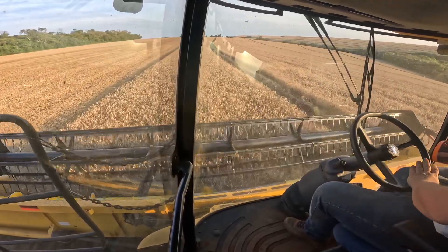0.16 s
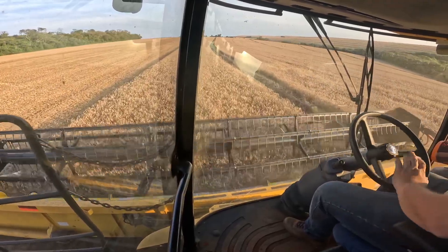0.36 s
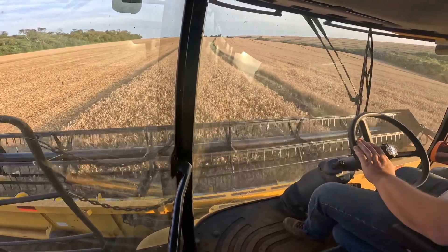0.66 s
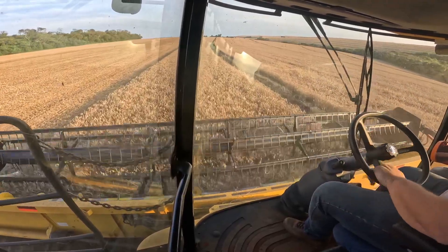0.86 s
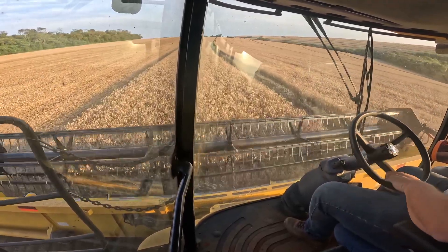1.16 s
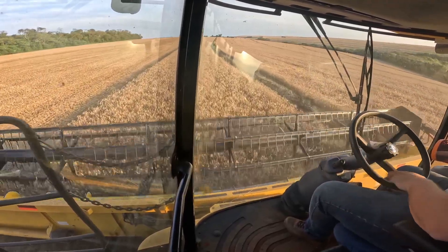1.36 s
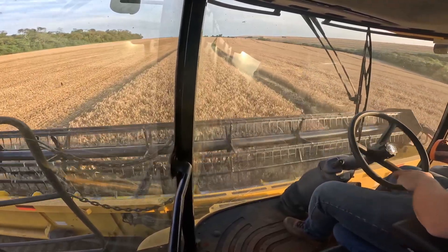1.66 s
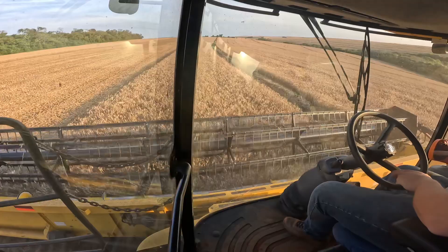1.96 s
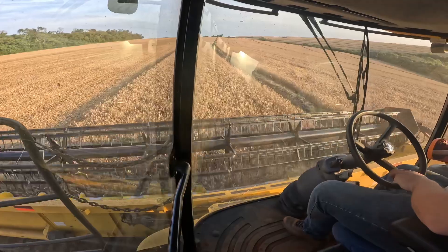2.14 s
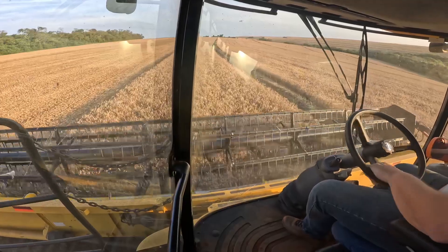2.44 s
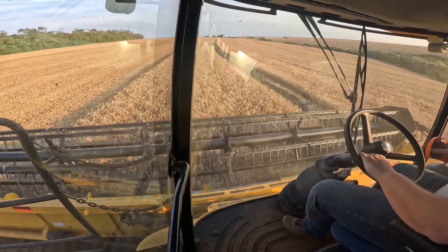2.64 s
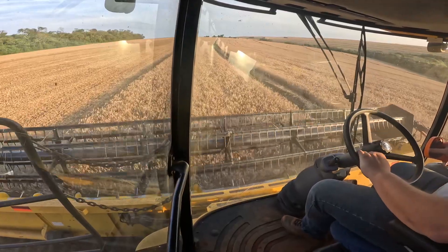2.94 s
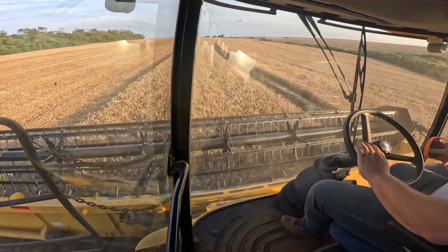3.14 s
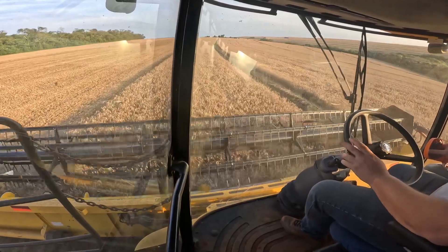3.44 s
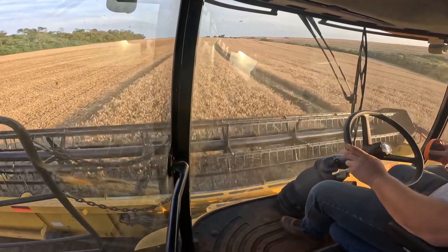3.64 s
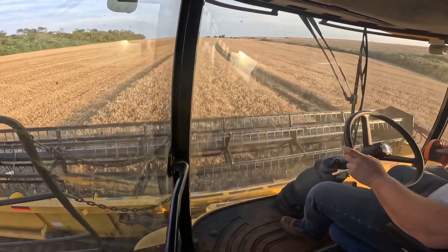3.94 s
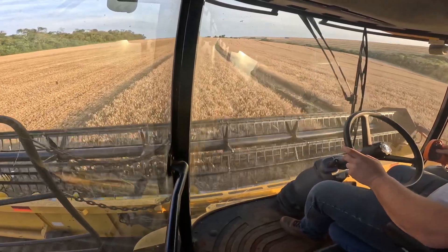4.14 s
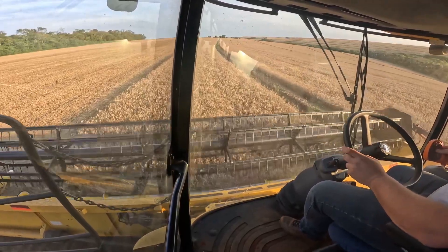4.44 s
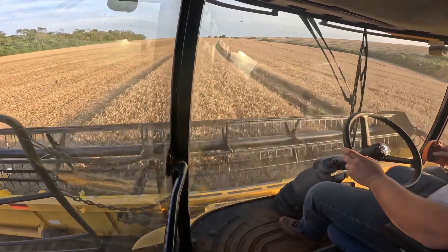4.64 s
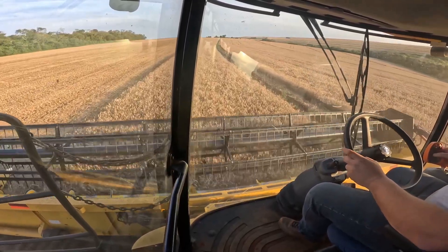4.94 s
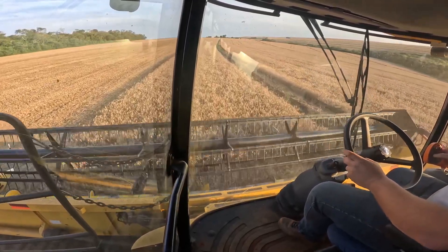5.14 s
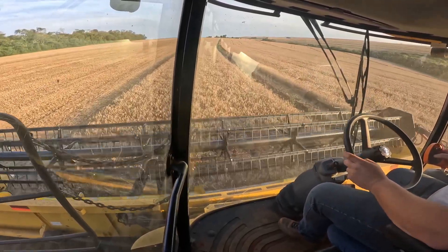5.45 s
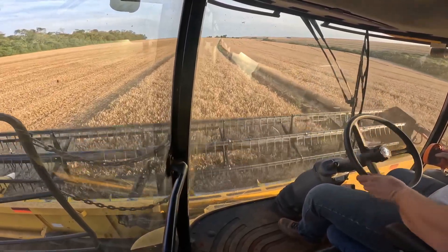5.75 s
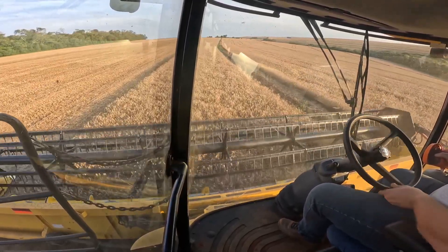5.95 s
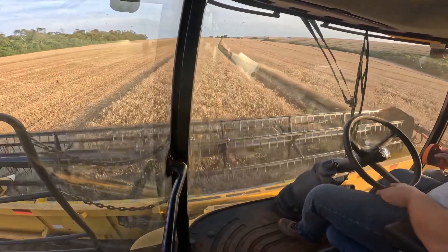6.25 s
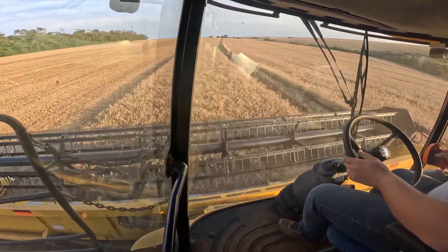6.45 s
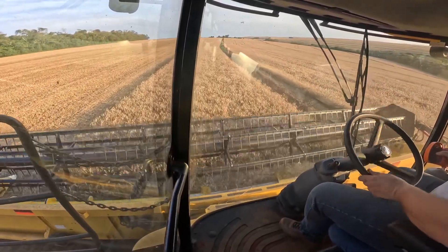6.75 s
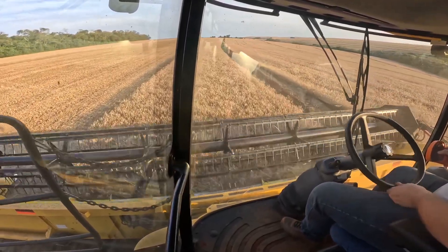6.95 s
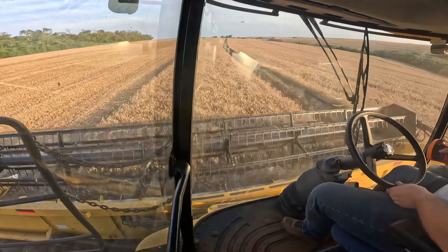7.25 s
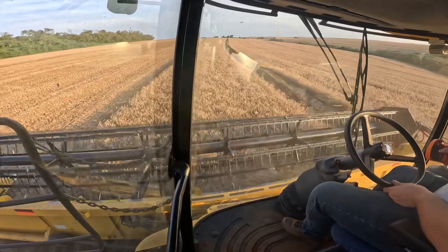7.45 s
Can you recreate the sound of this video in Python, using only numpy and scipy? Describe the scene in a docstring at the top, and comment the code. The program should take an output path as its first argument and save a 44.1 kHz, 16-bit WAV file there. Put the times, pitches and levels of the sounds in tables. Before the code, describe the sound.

Heavy combine engine at constant full throttle heard from the cab: low throbbing roar, muffled metallic clatter, thin whines, and short hydraulic groans when steering.

```python
"""Inside the closed cab of a combine harvester cutting grain, its diesel at steady full throttle.
The six-cylinder engine, knife, drum and shafts are sums of wandering sines that throb against each other.
Crop rumble, boom, clatter and hiss are noise shaped by spectra, with levels that follow time curves.
A fan and drives whine as drifting sines; the pump hums, and the steering valve groans in harmonic bursts.
Small ticks and the brushing of a palm on the wheel are short bands of noise."""
import sys
import numpy as np
from scipy import signal
from scipy.fft import rfft, irfft, next_fast_len
from scipy.io import wavfile
from scipy.ndimage import map_coordinates

SR = 44100
rng = np.random.default_rng(int(sys.argv[2]) if len(sys.argv) > 2 else 0)


def file_out(sig):
    """Save sig as 16-bit WAV at sys.argv[1]."""
    # one column per channel
    cols = np.atleast_2d(sig).T
    # limit, then scale
    lim = np.clip(cols, -1, 1)
    pcm = np.round(lim * 32767).astype(np.int16)
    wavfile.write(sys.argv[1], SR, pcm)


N = 335146
TIME = np.arange(N) / SR  # s

# Straw and ventilation hiss. Each row: frequency in Hz, density in dB per Hz.
HISS_SPECTRUM = [(2000, -115), (4000, -101), (4900, -99), (5600, -102), (7000, -109.3), (8100, -111.2),
                 (10000, -118.5), (11000, -126), (12400, -125), (15000, -131)]
# Straw sliding over the header. Each row: time in seconds, relative hiss level in dB.
STRAW_LEVEL = [(0, 0), (1, 0), (2.6, -0.5), (3.3, -1), (4.6, -0.5), (6.6, -0.5), (6.95, 2.5), (7.6, 1.5)]
# Engine and chain clatter. Each row: frequency in Hz, density in dB per Hz.
CLATTER_SPECTRUM = [(300, -100), (800, -74), (1050, -78.5), (1450, -80), (2050, -81), (2290, -76.5),
                    (2620, -83.5), (3450, -88), (4200, -96.5), (7000, -125), (12000, -160)]
# Crop load, as the swell of the clatter. Each row: time in seconds, relative level in dB.
CROP_LOAD = [(0, -0.3), (1, 0.1), (1.5, 0), (1.8, 0.5), (2.7, -1), (3.6, -1.5), (4.1, -1), (6.6, -0.5),
             (7.5, 1)]
# Small ticks in the cab. Each row: start in seconds, level in dB, centre in Hz,
# standard deviation of the band in octaves, time to fall 60 dB in seconds.
CAB_TICKS = [(1.112, -62, 8400, 0.25, 0.11), (1.808, -59, 6500, 0.52, 0.15),
             (4.538, -58.5, 6400, 0.52, 0.15), (6.672, -70, 8800, .15, .08)]
# The hand slides on the wheel. Each row: centre in seconds, standard deviation of the swell
# in seconds, peak level in dB.
HAND_SLIDES = [(.57, 0.06, -74.5), (.9, .06, -77), (2.56, .07, -79), (6.42, .05, -71)]
# Gear and belt whines. Each row: frequency in Hz, level in dB rms, speed wander in Hz.
DRIVE_WHINES = [(351, -45.5, 3), (441.3, -49, 1), (468.3, -56, 1), (507, -59, 1.2), (829.5, -54.5, 2),
                (855, -62, 1.5), (1367, -63.5, 4), (1818, -66, 7), (1957, -65.5, 7), (5432, -85, 15)]
# Belt slip, as the fan's blade rate. Each row: time in seconds, blade rate in Hz.
FAN_BLADE_RATE = [(0, 477.5), (.4, 480.5), (.95, 479), (1.07, 482.5), (1.35, 482.5), (1.8, 479),
                  (2.3, 482.3), (2.75, 480.5), (3.07, 483.5), (3.22, 479), (3.65, 483.8), (3.88, 477.5),
                  (4.45, 480), (4.72, 476), (5.02, 479), (5.4, 478), (5.88, 482), (6.35, 478.5),
                  (6.78, 477.5), (7.35, 482.3), (7.6, 477.5)]
# The fan's whine. Each row: time in seconds, level in dB rms.
FAN_WHINE_LEVEL = [(0, -41.5), (1.3, -39.5), (1.9, -42.5), (3.1, -41.5), (4, -41.5), (4.6, -41), (5.2, -44),
                   (6, -40.5), (6.9, -44), (7.5, -40.5)]
# The steering valve chatters under a hard turn. Each row: centre in seconds, standard deviation
# of the swell in seconds, pitch in Hz, glide in Hz per second, strongest harmonic, peak level in dB.
VALVE_GROANS = [(.095, .014, 390, 0, 2.7, -46.5), (.143, .016, 388, 0, 2, -41),
                (.22, .013, 392, 100, 2, -41.5), (.238, .012, 393, 200, 4.2, -47),
                (.297, .018, 390, 200, 2, -42), (.36, .016, 386, 0, 2, -42.5),
                (.4, .015, 394, -100, 3.1, -47), (.447, .013, 390, 0, 2.2, -44.5),
                (.925, .025, 392, 100, 4.6, -50), (3.893, .017, 390, 100, 3.6, -46),
                (3.938, .012, 385, 300, 2.1, -40), (3.955, .013, 391, 150, 4.6, -43.5),
                (3.972, .01, 385, 0, 2, -40.5), (4.016, .012, 384, 600, 1.9, -38.5),
                (4.047, .012, 398, 250, 3, -41), (6.287, .014, 388, 0, 3.2, -47.5),
                (6.33, .01, 380, -200, 2, -39), (6.358, .015, 388, 150, 3.3, -45),
                (6.41, .012, 376, -200, 2, -40.5), (6.495, .016, 386, 250, 3, -48)]
VALVE_HZ, VALVE_DB = 775, -7  # ring of the valve body: centre; level relative to the harmonics
# Hydraulic pressure, high while the wheel is worked, as the pump's hum.
# Each row: time in seconds, hum level in dB rms.
PUMP_PRESSURE = [(0, -37), (.5, -40.5), (1.9, -40.5), (2.2, -49), (3.3, -46.5), (4.1, -42.5), (4.35, -38),
                 (5.6, -37.5), (6.7, -41), (7.1, -50), (7.6, -47.5)]
# The oil lines ring. Each row: centre in Hz, full width at half amplitude in Hz, relative level in dB.
OIL_RESONANCES = [(745.5, 39, 3), (803, 110, -0.5), (1161, 55, 0), (1255, 49, -5), (1534, 45, -2.5),
                  (1960, 25, -5.5)]
PUMP_HZ = 384.0  # hum at the mean crank speed
OCTAVE_DB, OCTAVE_FALL = -54, 1  # octave at mean pressure, dB rms; dB it loses per dB of pressure
OIL_DB, OIL_GROWS = -50, 0.53  # oil rush at mean pressure, dB rms; dB it gains per dB of pressure
# The boom's air modes. Each row: centre in Hz, standard deviation in Hz, level in dB rms before the curve.
BOOM_AIR_MODES = [(145.4, 9, -33), (182.1, 10, -33)]
# The cab's boom. Each row: time in seconds, level in dB relative to its modes.
BOOM_LEVEL = [(0, -7.5), (.5, -2), (1.4, 2), (2.1, -4.5), (2.7, 4), (3.4, -1.5), (4.2, 3), (4.8, -3),
              (5.5, 0.5), (6.1, -4.5), (7.5, 1.5)]
# Crop and threshing noise through the cab walls. Each row: frequency in Hz, density in dB per Hz.
RUMBLE_SPECTRUM = [(5, -69.5), (18, -55.5), (30, -48.5), (46, -53), (72, -50.5), (115, -52.5), (200, -48.5),
                   (260, -52.5), (330, -57), (400, -58.5), (540, -65), (650, -71), (900, -79), (3000, -125),
                   (8000, -160)]
# Air modes of the cab. Each row: centre in Hz, two standard deviations in Hz, lift in dB.
CAB_AIR_MODES = [(36.5, 4.8, 7), (59, 9.9, 9), (94, 11, 6.5), (302, 7.3, 1.5), (366, 14, 3)]
# Knife and shafts. Each row: frequency in Hz, level in dB rms, speed wander in Hz.
SHAFT_TONES = [(9.6, -39, .05), (19.1, -47, .1), (22.9, -34, .1), (38.1, -39.5, .15), (55, -38.5, .2),
               (57.3, -36.5, .25), (59.5, -39.5, .3), (92.5, -43.5, .25), (96.6, -43, .25),
               (113.5, -46, .25), (228.4, -41.5, .35), (232, -46, .6), (252.6, -44.5, .35),
               (264.9, -47, .25)]
# Beat of the drum's bars, stronger in thick crop. Each row: time in seconds, level in dB rms.
BAR_BEAT_LEVEL = [(0, -40.5), (.8, -29), (1.3, -35), (1.6, -30), (1.9, -41.5), (2.6, -28.5), (3, -32.5),
                  (3.3, -28), (3.85, -41), (4.2, -26), (4.55, -38), (4.95, -25), (5.4, -29.5), (5.8, -28),
                  (6.5, -31.5), (7.1, -41.5), (7.45, -29.5)]
SHAKE_HZ, SHAKE_DB = 26.65, -27.5  # the drum shakes the cab: rate; level in dB rms
BARS_HZ = 88.2  # its bars beat on the crop
# Diesel tones. Each row: multiple of the crank speed, level in dB rms.
ENGINE_ORDERS = [(1, -46), (1.5, -38), (3, -33), (3.5, -45), (4.5, -35.3), (6, -34.3)]
CRANK_HZ = 35.0
EDGE_S, TOP_HZ = .004, 15100  # length of the opening fade; low-pass cutoff


def amp(db):
    """Logarithmic level: 20 dB is a tenfold gain."""
    return 10 ** (np.asarray(db) / 20)


def unit(x):
    """Normalisation by the root mean square, to rms 1."""
    return x / np.sqrt(np.mean(x ** 2) + 1e-20)


def along(points, hz):
    """Interpolation of a spectrum over a logarithmic frequency axis."""
    point_hz, value = np.transpose(points)
    return np.interp(np.log(hz + 1), np.log(point_hz + 1), value)


def curves(rows):
    """Linear interpolation in time: one value per sample for each column after the time."""
    seconds, *columns = np.transpose(rows)
    return [np.interp(TIME, seconds, column) for column in columns]


def wobble(rate):
    """Slow random modulation: a smooth curve through `rate` Gaussian knots a second."""
    knots = rng.standard_normal(int(N * rate / SR) + 4)
    coarse_time = TIME[::32]
    return np.interp(TIME, coarse_time, map_coordinates(knots, [coarse_time * rate]))


def noise(gain):
    """Spectral shaping: white noise filtered to the amplitude density gain(Hz) per root Hz."""
    size = next_fast_len(N + 8192)
    hz = np.fft.rfftfreq(size, 1 / SR)
    spectrum = rfft(rng.standard_normal(size)) * gain(hz)
    return irfft(spectrum, size)[:N] * np.sqrt(SR / 2)


def band(centre_hz, octaves):
    """Band-limited noise: a bell over log frequency, of rms 1."""
    return unit(noise(lambda hz: np.exp(-.5 * (np.log2((hz + 1) / centre_hz) / octaves) ** 2)))


def turns(hz):
    """Phase as the time integral of frequency, in revolutions."""
    return np.cumsum(hz) / SR


def tone(cycles):
    """Simple harmonic motion: a sine of rms 1 with a random starting phase."""
    return np.sqrt(2) * np.sin(2 * np.pi * (cycles + rng.random()))


def swell(centre_s, spread_s):
    """Gaussian envelope: a smooth rise and fall with a peak of 1."""
    return np.exp(-.5 * ((TIME - centre_s) / spread_s) ** 2)


def hiss(straw_db, uneven_db=1.0):
    """Transmission loss: only a little broadband treble passes the glass, uneven in level."""
    level = amp(straw_db + uneven_db * wobble(25))
    return level * noise(lambda hz: amp(along(HISS_SPECTRUM, hz)))


def clatter(load_db, crank, firing_rms=0.035, uneven_db=0.63):
    """Amplitude modulation: metal noise pulses lightly at the firing rate, three times a turn."""
    pulsing = 1 + firing_rms * tone(3 * crank)
    level = amp(load_db + uneven_db * wobble(14))
    return level * pulsing * noise(lambda hz: amp(along(CLATTER_SPECTRUM, hz)))


def ticks(attack_s=.003):
    """Exponential decay: each tick is a band of noise with a quick rise and a steady fall in dB."""
    out = np.zeros(N)
    for start_s, db, hz, octaves, t60 in CAB_TICKS:
        age = np.maximum(TIME - start_s, 0)
        decay = amp(db - 60 * age / t60)
        out += decay * (1 - np.exp(-age / attack_s)) * band(hz, octaves)
    return out


def palm_on_wheel(grain_db=3.5):
    """Sliding friction: a palm brushing the wheel gives treble noise of rapidly varying level."""
    brushing = sum(amp(db) * swell(centre_s, spread_s) for centre_s, spread_s, db in HAND_SLIDES)
    grain = unit(amp(grain_db * np.tanh(wobble(130))))
    return brushing * grain * band(centre_hz=7000, octaves=0.58)


def rotors(table, sway_db, wander_rate):
    """Rotational tones: belt-driven parts, each slipping a little in speed and swaying in level."""
    out = np.zeros(N)
    for hz, db, wander_hz in table:
        speed = hz + wander_hz * wobble(wander_rate)
        out += amp(db + sway_db * wobble(3)) * tone(turns(speed))
    return out


def fan(flutter_hz=0.57, sway_db=1.0):
    """Blade-passing tone: the clearest whine, its pitch drifting as the belt slips."""
    blade_hz, = curves(FAN_BLADE_RATE)
    level_db, = curves(FAN_WHINE_LEVEL)
    return amp(level_db + sway_db * wobble(6)) * tone(turns(blade_hz + flutter_hz * wobble(20)))


def groans(jitter=.024, harmonic_spread=.9):
    """Valve chatter: gliding, rough harmonic bursts, each with the ring of the valve body."""
    out = np.zeros(N)
    for centre_s, spread_s, hz, glide, strongest, db in VALVE_GROANS:
        pitch = hz + glide * np.clip(TIME - centre_s, -2 * spread_s, 2 * spread_s)
        cycles = turns(pitch * (1 + jitter * wobble(220)))
        buzz = np.zeros(N)
        for k in range(1, 7):
            buzz += tone(k * cycles) / (1 + ((k - strongest) / harmonic_spread) ** 2)
        body_ring = amp(VALVE_DB) * band(centre_hz=VALVE_HZ, octaves=0.1)
        out += amp(db) * swell(centre_s, spread_s) * (unit(buzz) + body_ring)
    return out


def hydraulics(crank, buzz_db=-11, gurgle_db=1.6, waver_hz=0.26):
    """Pump pulsation and line resonance: pressure lifts hum and oil rush but weakens the octave."""
    hum_db, = curves(PUMP_PRESSURE)
    pressure_db = hum_db - hum_db.mean()
    teeth = crank * PUMP_HZ / CRANK_HZ + turns(waver_hz * wobble(4))
    hum = amp(hum_db) * tone(teeth)
    octave = amp(OCTAVE_DB - OCTAVE_FALL * pressure_db) * tone(2 * teeth)
    flow_db = OIL_DB + OIL_GROWS * pressure_db + gurgle_db * wobble(12)
    buzz = amp(buzz_db) * tone(3 * teeth + .15 * wobble(35))  # level relative to the rush

    def line_gain(hz):
        return sum(amp(db) / (1 + ((hz - centre) / width * 2) ** 2) for centre, width, db in OIL_RESONANCES)

    return hum + octave + amp(flow_db) * (buzz + unit(noise(line_gain)))


def boom(lumps_db=0.4):
    """Cavity resonance: lumps of crop in the feeder set the cab's air modes booming."""
    boom_db, = curves(BOOM_LEVEL)
    ring = np.zeros(N)
    for centre, spread_hz, db in BOOM_AIR_MODES:
        ring += amp(db) * unit(noise(lambda hz: np.exp(-.5 * ((hz - centre) / spread_hz) ** 2)))
    return amp(boom_db + lumps_db * wobble(9.1)) * ring


def threshing(crank, throb_rms=0.0425, lumps_db=.5):
    """Modal response: beaten crop rumbles, lifted by the cab's modes, throbbing every two crank turns."""
    def cab_lift(hz):
        return sum(db * np.exp(-2 * ((hz - centre) / width) ** 2) for centre, width, db in CAB_AIR_MODES)

    rumble = noise(lambda hz: amp(along(RUMBLE_SPECTRUM, hz) + cab_lift(hz)))
    throbbing = 1 + throb_rms * tone(crank / 2)
    return amp(lumps_db * wobble(8)) * rumble * throbbing


def drum(slip=0.0023, sway_db=0.25):
    """Forced vibration: the drum shakes the cab, and its bars beat harder in thick crop."""
    bars_db, = curves(BAR_BEAT_LEVEL)
    speed = 1 + slip * wobble(3)  # shared by shake and bars
    shake = amp(SHAKE_DB + sway_db * wobble(3.7)) * tone(turns(SHAKE_HZ * speed))
    beat = amp(bars_db + sway_db * wobble(4.6)) * tone(turns(BARS_HZ * speed))
    return shake + beat


def diesel(crank):
    """Engine orders: the third is the firing rate, and uneven cylinders add the half orders."""
    return sum(amp(db) * tone(order * crank) for order, db in ENGINE_ORDERS)


def scene():
    """Superposition: all sources add, several sharing the phase of one slightly wandering crank."""
    crank = turns(CRANK_HZ + 0.035 * wobble(1.95))
    load_db, = curves(CROP_LOAD)
    straw_db, = curves(STRAW_LEVEL)
    rush = hiss(straw_db) + clatter(load_db, crank) + boom() + threshing(crank)
    small_noises = ticks() + palm_on_wheel()
    whine = rotors(DRIVE_WHINES, sway_db=0.5, wander_rate=9) + fan()
    steering = groans() + hydraulics(crank)
    drone = rotors(SHAFT_TONES, sway_db=1.0, wander_rate=3.01) + drum() + diesel(crank)
    return (rush + small_noises + whine + steering + drone)[None]


def record(dry):
    """Band limitation: a brief opening fade, then a steep low-pass that cuts the highest treble."""
    opening = np.sin(np.pi / 2 * np.minimum(TIME / EDGE_S, 1)) ** 2
    low_pass = signal.butter(24, TOP_HZ, fs=SR, output="sos")
    return signal.sosfilt(low_pass, dry * opening)


dry = scene()
out = record(dry)
file_out(out)
```